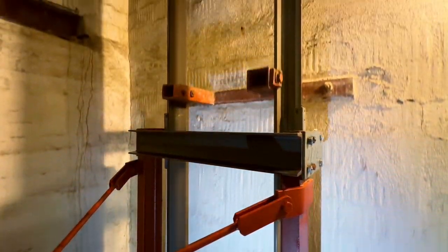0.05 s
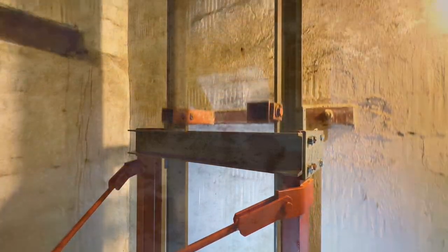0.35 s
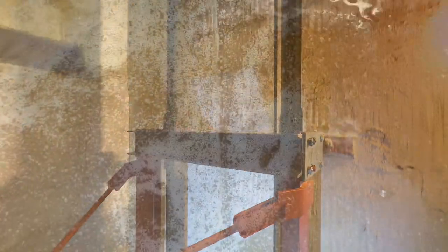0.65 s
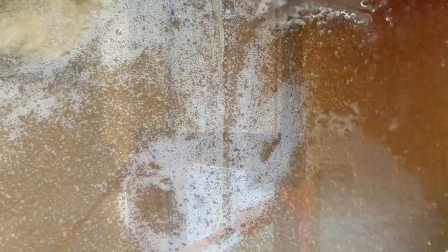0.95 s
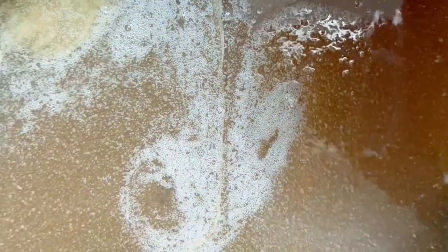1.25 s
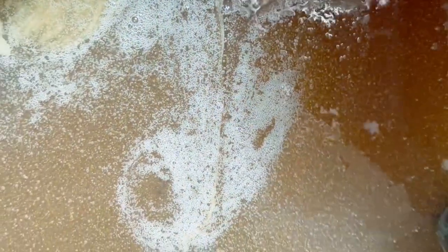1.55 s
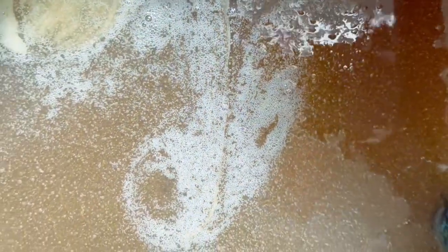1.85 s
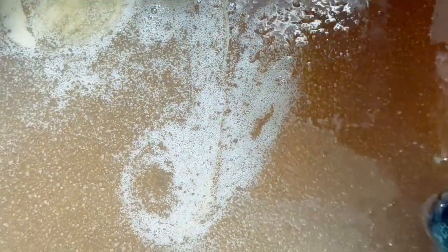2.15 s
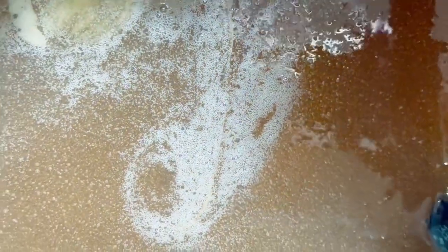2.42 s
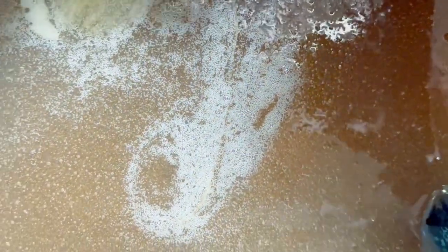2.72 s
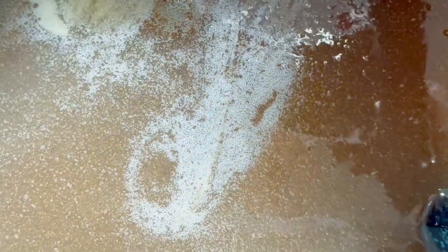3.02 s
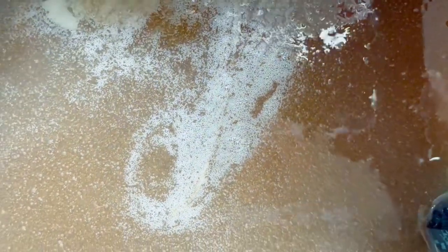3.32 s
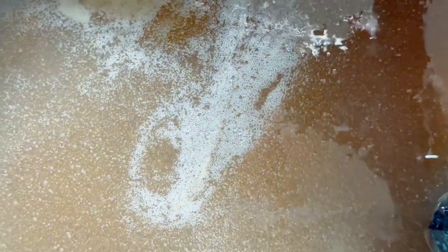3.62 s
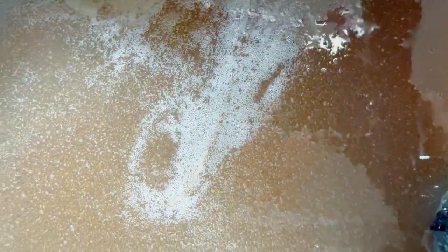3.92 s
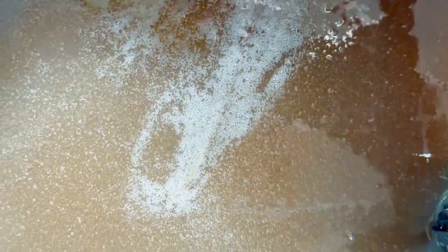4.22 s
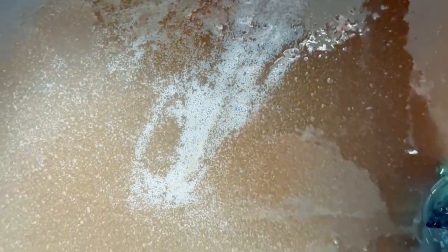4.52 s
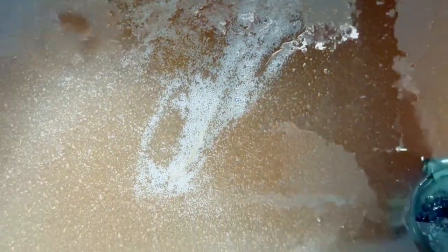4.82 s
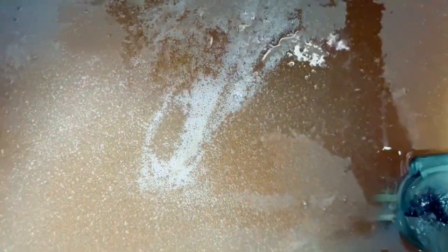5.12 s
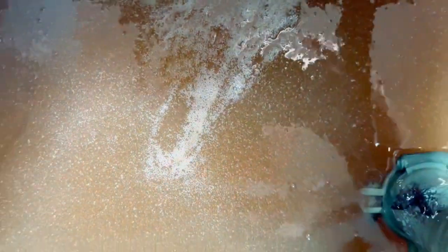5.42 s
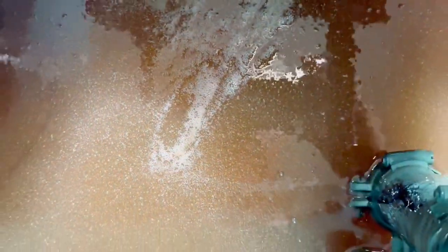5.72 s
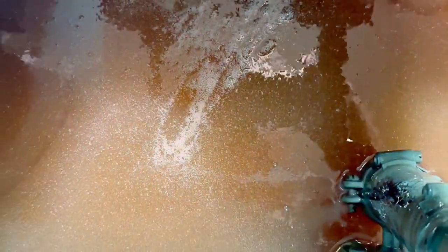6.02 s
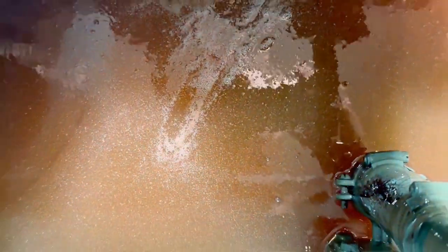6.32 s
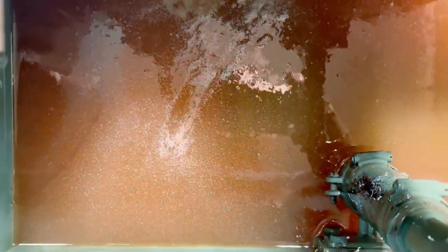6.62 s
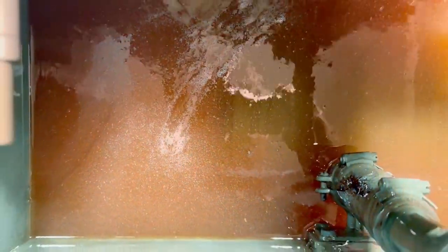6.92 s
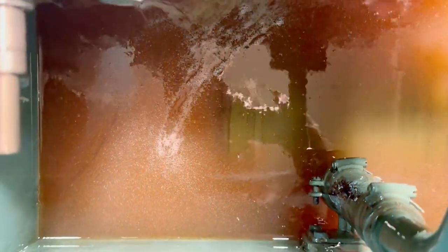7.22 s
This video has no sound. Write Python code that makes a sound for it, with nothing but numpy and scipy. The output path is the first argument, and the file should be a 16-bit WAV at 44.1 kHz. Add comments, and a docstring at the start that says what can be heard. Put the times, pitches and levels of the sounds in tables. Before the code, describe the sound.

Oil rushes, churns and fizzes into a resonant steel tank, close to the microphone, over the throbbing hum and wavering whine of a submerged lift pump. This fades in from an opening second inside the lift shaft, with a low boom from the car and a few short hisses on the left. Later the microphone pulls away from the oil, a steady pump tone stands out more and the tank's rumble eases.

```python
"""An old hydraulic lift, heard from two places. First inside the shaft: the car frame booms and a guide
shoe hisses along its rail on the left. With two spits of hiss this dissolves into the open oil tank, the
microphone close over the oil: a submerged pump hums and whines, beating against its motor, and returning
oil rushes and foams between ringing steel walls. The microphone draws back, the pump's main tone grows
strong, and the rumble drops as the microphone passes the rim."""
import sys
import numpy as np
from scipy import signal
from scipy.fft import rfft, irfft
from scipy.io import wavfile
from scipy.ndimage import uniform_filter1d

SR = 44100
rng = np.random.default_rng(int(sys.argv[2]) if len(sys.argv) > 2 else 0)


def transcribe(u):
    """Save the signal u as a 16-bit wav file named by the first command-line argument.

    u: samples, shape (n,) or (channels, n), limited to [-1, 1]; the rate is SR.
    q: integer samples, one column per channel.
    """
    v = np.clip(np.atleast_2d(u).T, -1, 1)
    q = np.round(v * 32767).astype(np.int16)
    wavfile.write(sys.argv[1], SR, q)


N = 320166
TIME = np.arange(N) / SR
FREQ = np.maximum(np.arange(N // 2 + 1) * SR / N, 1)
PUMP_HZ, MAINS_HZ = 48.5, 50  # turns a second of the pump; the motor's supply

# how alike the two microphone ports hear the tank (1 = the same): frequency_hz, likeness
TANK_LIKENESS = [(110, 1), (200, 0.87), (380, 0.57), (650, 0.14), (1200, 0.38), (2200, 1), (4000, 0.86),
                 (6000, 1), (12500, 1), (15000, 0.32)]
# antinodes and nodes the microphone drifts through: pump_harmonic, centre_s, half_length_s, gain_db
STANDING_WAVES = [(1, 3.4, 3.2, 5.5), (2, 3.7, 2.3, 10.5), (3, 1.13, 1.12, 12.5), (4, 1.1, 1.06, 18.5),
                  (44, 2.9, 1, 8.5), (44, 4.8, 0.66, -11), (44, 6.15, 0.55, 3.5), (52, 4.2, 1.0, 5),
                  (52, 6.65, 0.65, 7)]


def undb(db):
    """Decibels to gain."""
    return 10 ** (np.asarray(db) / 20)


def unit(x):
    """Scale to rms 1."""
    return x / np.sqrt(np.mean(x ** 2))


def noise():
    """Two unrelated white noises."""
    return rng.standard_normal((2, N))


def ramp(start_s, end_s):
    """Rise from 0 to 1 between two times."""
    return np.clip((TIME - start_s) / (end_s - start_s), 0, 1)


def bump(centre_s, half_s):
    """A smooth rise to 1 and back."""
    return np.exp(-((TIME - centre_s) / half_s) ** 2)


def walk(rate_hz):
    """Smooth random wander with a spread near 1."""
    hold = int(SR / rate_hz)
    steps = rng.standard_normal(1024)[np.arange(N) // hold % 1024]
    return np.sqrt(2) * uniform_filter1d(uniform_filter1d(steps, hold), hold)


def across(points):
    """Spread rows of frequency_hz, value over the frequency axis."""
    hz, value = np.transpose(points)
    return np.interp(np.log(FREQ), np.log(hz), value)


def shape(x, gain):
    """Filter by a gain per frequency."""
    return irfft(rfft(x) * gain, N)


def resonance(hz, width_hz):
    """Steep-sided resonance, gain 1 at the centre."""
    return 1 / (1 + .5j * hz / width_hz * (FREQ / hz - hz / FREQ)) ** 2


def body(modes):
    """Response of several resonances; neighbours swing a quarter cycle apart."""
    return sum(1j ** k * undb(db) * resonance(hz, width) for k, (hz, width, db) in enumerate(modes))


def pan(x, left_db):
    """Place a sound; left_db is left minus right."""
    return x * undb(np.array([[left_db], [-left_db]]) / 2)


def ports(pair, likeness):
    """Blend two unrelated sounds into left and right at rms 1, as alike as the table says."""
    alike = np.clip(across(likeness), -1, 1)
    mid, side = shape(pair, np.sqrt([1 + alike, 1 - alike]))
    return unit(np.array([mid + side, mid - side]))


def turbulence(flicker_db, rate_hz):
    """Two noises in ten octave bands that flicker each on its own."""
    white, octave = rfft(noise()), np.log2(FREQ / SR) + 10
    bands = (irfft(white * np.maximum(1 - abs(octave - k), 0), N) for k in range(10))
    return unit(sum(band * undb(flicker_db * walk(rate_hz)) for band in bands))


def lift_car():
    """The moving car shudders once, drones and booms in the masonry shaft, and the steel rail rings."""
    # resonances of the shaft: centre_hz, width_hz, gain_db
    shaft_modes = [(58, 6, -0.5), (91, 7.3, 0), (119.5, 8.3, 0.5), (187.4, 6.4, -9), (238, 13, -9.5),
                   (307.7, 14.7, -5), (390.6, 5.9, -8), (940, 12, -18), (1053, 15, -16)]
    # spectrum of the air in the shaft: frequency_hz, gain_db
    air_spectrum = [(60, -10), (150, 0.8), (300, -5), (500, -4), (700, -9), (1050, -15), (1500, -15),
                    (2500, -25), (4000, -26.5), (4800, -31), (7000, -33.5), (10000, -41), (15000, -56)]
    # how alike the two ports hear the shaft: frequency_hz, likeness
    shaft_likeness = [(60, 0.92), (130, 0.97), (290, 0.59), (640, 0.22), (1400, 0.15), (15000, .05)]
    shudder = bump(centre_s=.029, half_s=.21)
    drone_hz = 64.4 * (1 + .024 * walk(12))
    drone = np.sqrt(2) * np.sin(2 * np.pi * np.cumsum(drone_hz) / SR)
    boom = ports(shape(noise(), body(shaft_modes)), shaft_likeness)
    air = shape(turbulence(flicker_db=1.2, rate_hz=14.1), undb(across(air_spectrum)))
    air = pan(ports(air, shaft_likeness), left_db=1)
    rail = np.exp(-TIME / .4) * unit(shape(noise(), resonance(hz=4770, width_hz=220)))
    stirred = undb(-18.5) * boom + undb(-22.5) * air + undb(-46) * rail
    return undb(-24 + 9.5 * shudder) * drone + undb(4.5 * shudder) * stirred


def harmonic(turns, multiple):
    """A sine of rms 1 and random phase at a multiple of the pump's turning rate."""
    return np.sqrt(2) * np.sin(2 * np.pi * (multiple * turns + rng.random()))


def standing_wave(turns, multiple):
    """A pump harmonic that swells or sinks as the microphone drifts through an antinode or a node."""
    swell_db = sum(db * bump(s, half_s) for k, s, half_s, db in STANDING_WAVES if k == multiple)
    return undb(swell_db) * harmonic(turns, multiple)


def pump_drone(turns, near):
    """The pump's pressure ripple and its motor's magnetic hum, which carry into the lift shaft too."""
    # low hum, away from any antinode: pump_harmonic, relative_db
    hum_lines = [(1, -34.5), (2, -30), (3, -31), (4, -46)]
    # steady overtones of the ripple: pump_harmonic, relative_db
    ripple_lines = [(8, -39.5), (10, -40.5), (12, -42), (14, -42.5), (18, -38.5), (19, -50), (24, -49.5),
                    (37, -49), (46, -55), (58, -56.5), (59, -59), (92, -64)]
    # course of the main tone: time_s, level_db
    tone_levels = [(0, -24), (.33, -39), (.55, -21), (.8, -29), (1.05, -18.5), (2.15, -20), (2.5, -16),
                   (3.6, -21), (4.49, -30), (4.58, -21), (5.22, -18), (5.3, -14.5), (6.4, -11.5),
                   (7.26, -13)]
    hum = sum(undb(db) * standing_wave(turns, k) for k, db in hum_lines)
    # twice the mains rate lies just above twice the pump's rate, so the two throb
    magnet = undb(-29) * harmonic(turns, 2 * MAINS_HZ / PUMP_HZ)
    # the sloshing oil shakes the overtones a little
    ripple = sum(undb(db + min(k / 4, 2) * walk(7)) * harmonic(turns, k) for k, db in ripple_lines)
    tone_db = np.interp(TIME, *np.transpose(tone_levels)) + .4 * walk(18)
    tone = (undb(tone_db) + undb(-40) * walk(12)) * harmonic(turns, 6)
    return pan(tone, left_db=1.6) + (.41 + .64 * near) * pan(ripple + hum + magnet, left_db=.29)


def guide_shoe():
    """The shoe rubs its rail on the left: each rub catches quickly, holds and dies away."""
    # spectrum of the shoe's hiss: frequency_hz, gain_db
    hiss_spectrum = [(3000, -23), (4200, -19), (4700, 3), (5300, 0), (8500, 6), (10500, 4.5), (13000, 7),
                     (15500, 1)]
    # rubs on the rail: start_s, length_s, level_db
    rubs = [(0.043, .05, -42), (.125, .045, -41), (.205, 0.057, -41)]
    attack_s, decay_s = .01, .047
    friction = noise() * undb(.87 * walk(120))
    hiss = unit(shape(friction, undb(across(hiss_spectrum))))
    pressure = 0
    for start_s, length_s, db in rubs:
        release = np.exp(-np.maximum(TIME - start_s - length_s, 0) / decay_s)
        pressure += undb(db) * ramp(start_s, start_s + attack_s) * release
    return pan(hiss * pressure, left_db=13)


def pump_whine(turns):
    """Two high harmonics of the pump waver in the standing waves near the tank."""
    # whines, away from any node or antinode: pump_harmonic, level_db
    whines = [(44, -45), (52, -53.5)]
    return sum(standing_wave(turns, k) * undb(db + .91 * walk(10)) for k, db in whines)


def screw_rattle(turns):
    """The pump's screws clatter in the same pattern on every turn."""
    one_turn = rng.standard_normal((2, round(SR / PUMP_HZ)))
    clatter = np.array([np.interp(turns % 1, np.linspace(0, 1, len(side)), side) for side in one_turn])
    return undb(-46) * ports(shape(clatter, resonance(hz=2440, width_hz=1040)), TANK_LIKENESS)


def tank_rumble(back):
    """The return jet shakes the steel tank; drawing back shifts the balance of its resonances."""
    # resonances of the tank and its room: centre_hz, width_hz, close_db, far_db
    tank_modes = [(59.5, 7.5, -6, -8), (81.2, 1.4, 5.5, 3.5), (118, 6.1, -0.5, 3.5), (129.9, 4.1, 1.5, 1),
                  (143.2, 4.1, 1.5, 0.5), (173, 14, -5.5, -11.5), (200, 18.6, -8.5, -18.5),
                  (235.7, 4.4, -11.5, -12.5), (295.2, 14.1, -1.5, -1.5), (376, 13.7, -11, -5.5),
                  (449, 22, -11, -7), (488.7, 14, -7, -6.5), (571.6, 20.6, -9, -28), (768, 92, -37, -16),
                  (1102, 41, -22, -18.5), (2215, 400, -32.5, -36)]
    hz, width_hz, close_db, far_db = np.transpose(tank_modes)
    jet = noise()
    close = shape(jet, body(zip(hz, width_hz, close_db)))
    far = shape(jet, body(zip(hz, width_hz, far_db)))
    return (1 - back) * close + back * far


def bubbles(low_hz, high_hz, cycles, spread_db, per_pitch):
    """A crowd of bubbles, each a short ring that rises in pitch: mostly faint, a few loud."""
    crowd = np.zeros((2, N))
    for hz in np.geomspace(low_hz, high_hz, 24):
        age = np.arange(int(cycles * SR / hz) + 2) * hz / SR / cycles
        ring = np.exp(-np.log(300) * age) * np.sin(2 * np.pi * cycles * age * (1 + age / 10))
        side, when, rarity = rng.random((per_pitch, 3)).T
        strength = undb(-spread_db * np.log(np.maximum(rarity, 1 / per_pitch)))
        births = np.zeros((2, N))
        births[(2 * side).astype(int), (N * when).astype(int)] = strength
        crowd += hz * signal.oaconvolve(births, ring[None])[:, :N]
    return unit(crowd)


def oil_rush():
    """The turbulent jet churns bubbles into the oil."""
    # spectrum of the rushing oil: frequency_hz, gain_db
    rush_spectrum = [(40, -39), (55, -11), (160, -9.5), (215, -7.5), (255, -4), (330, -5.5), (400, -2.5),
                     (490, -2.5), (620, -6), (820, -8.5), (1000, -14), (1400, -19.5), (2200, -25),
                     (5000, -44.5)]
    churn = bubbles(300, 2000, cycles=10, spread_db=1.2, per_pitch=600)
    flow = turbulence(flicker_db=1.2, rate_hz=16)
    return shape(flow + undb(-8.5) * churn, undb(across(rush_spectrum)))


def oil_foam(turns):
    """Tiny bubbles fizz on the oil, pulsing faintly with the pump."""
    # spectrum of the foam: frequency_hz, gain_db
    foam_spectrum = [(600, -30), (1300, 5), (2000, 0.5), (2500, -2.5), (3000, -3.5), (3700, -5),
                     (4400, -11), (6500, -9), (10200, -12.5), (11700, -28), (15500, -31.5)]
    fizz = bubbles(1500, 14000, cycles=4, spread_db=1.8, per_pitch=2000)
    hiss = turbulence(flicker_db=.78, rate_hz=18)
    pulse = 1 + .02 * np.sin(2 * np.pi * turns)
    return pulse * shape(hiss + undb(-10.5) * fizz, undb(across(foam_spectrum)))


def valve_ring():
    """A faint narrow ring, likely from the return valve."""
    return shape(noise(), resonance(hz=3770, width_hz=52))


def oil_tank(turns):
    """The returning oil from above: the microphone starts close, draws back, then passes the rim."""
    # the hiss spreads wide between left and right around 8 kHz: frequency_hz, left_lead_rad
    stereo_phase = [(2000, 0), (3500, .6), (6500, 0), (7300, 1), (7850, 3), (8600, 3.1), (9300, 1.4),
                    (11000, 0), (15000, -.6)]
    back, past_rim = ramp(2.3, 5.9), ramp(6.4, 7.26)
    layers = ((tank_rumble(back), -19 - 6 * past_rim),
              (oil_rush(), -22 - 1.5 * back),
              (oil_foam(turns), -34),
              (valve_ring(), -53 + 5.3 * bump(centre_s=3.4, half_s=.45)))
    tank = sum(ports(layer, TANK_LIKENESS) * undb(db) for layer, db in layers)
    spread = np.exp(.5j * across(stereo_phase) * np.array([[1], [-1]]))
    return pan(shape(tank, spread), left_db=.4)


def spits():
    """Short bursts of hiss, left of centre, that die away."""
    # spits of hiss: start_s, relative_db, decay_s, centre_hz
    bursts = [(.56, -39, 0.016, 5800), (1.08, -50, .07, 12800)]
    sound = 0
    for start_s, db, decay_s, hz in bursts:
        hiss = unit(shape(noise(), resonance(hz, width_hz=.3 * hz)))
        attack = ramp(start_s, start_s + .3 * decay_s)
        sound += hiss * undb(db) * attack * np.exp(-abs(TIME - start_s) / decay_s)
    return pan(sound, left_db=4.6)


def scene():
    """The shaft dissolves into the tank while the pump turns steadily."""
    near = ramp(.33, 1.09)  # 0 in the shaft, 1 at the tank
    turns = np.cumsum(PUMP_HZ * (1 + .000283 * walk(2.004))) / SR
    shaft = (1 - near) ** .73 * lift_car() + guide_shoe()
    spitting = spits()
    pump = pump_drone(turns, near) + near * pump_whine(turns) + near ** 2 * screw_rattle(turns)
    return shaft + spitting + pump + near * oil_tank(turns)


def record(dry):
    """The recorder drops the deepest bass, clips at full scale and cuts the top."""
    bass_cut = signal.butter(8, 42, "high", fs=SR, output="sos")
    top_cut = signal.ellip(10, .1, 80, 15500, fs=SR, output="sos")
    return signal.sosfilt(top_cut, np.clip(signal.sosfilt(bass_cut, dry), -1, 1))


dry = scene()
out = record(dry)
transcribe(out)
```